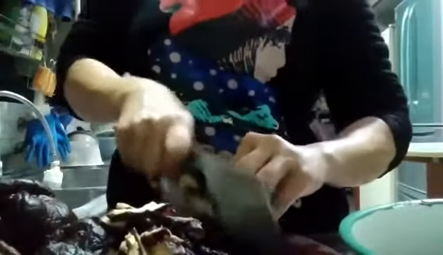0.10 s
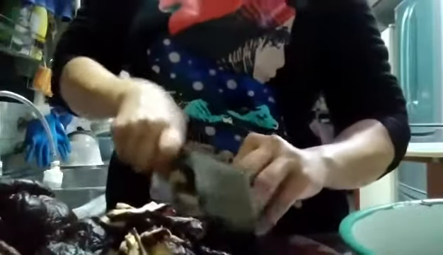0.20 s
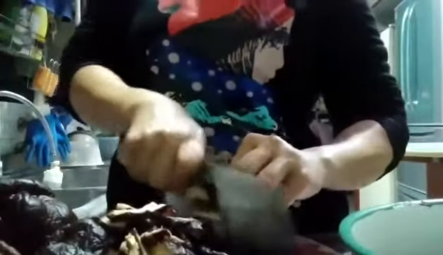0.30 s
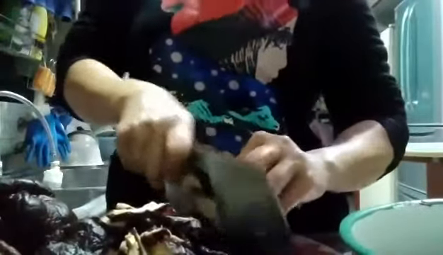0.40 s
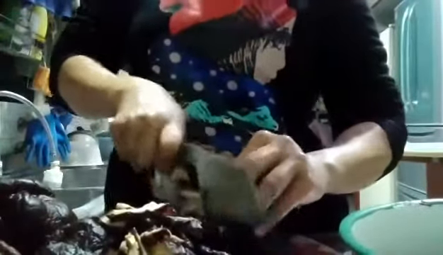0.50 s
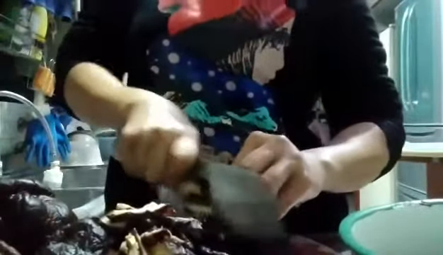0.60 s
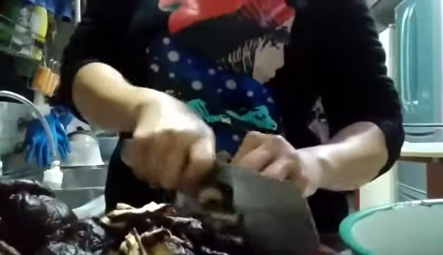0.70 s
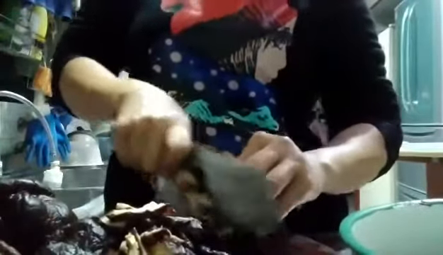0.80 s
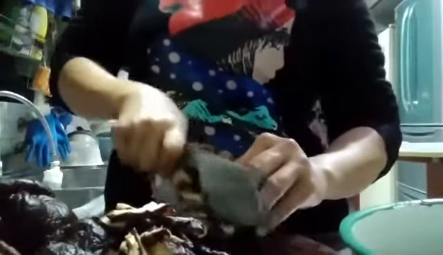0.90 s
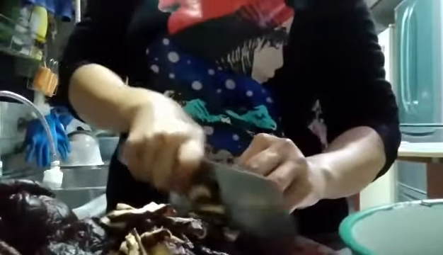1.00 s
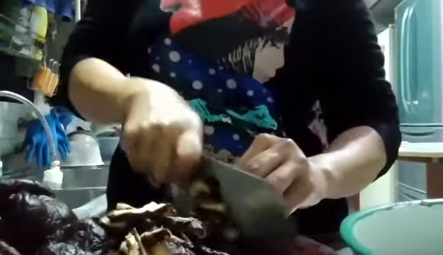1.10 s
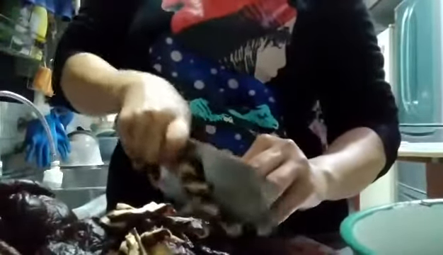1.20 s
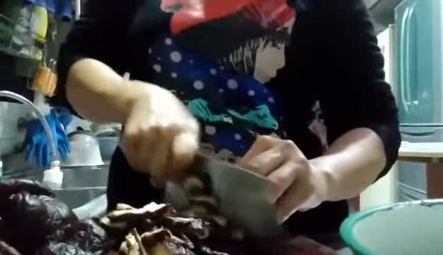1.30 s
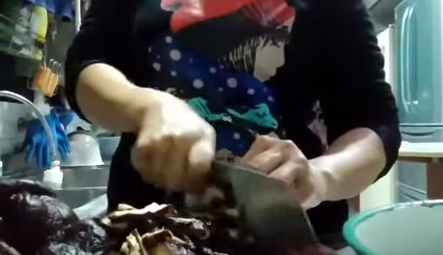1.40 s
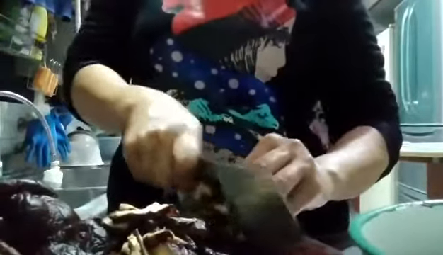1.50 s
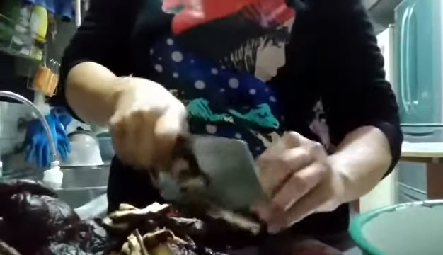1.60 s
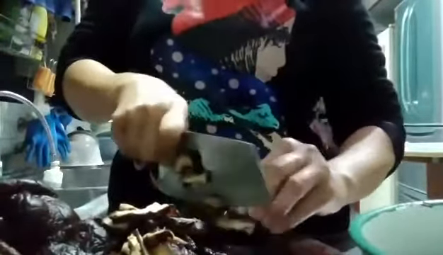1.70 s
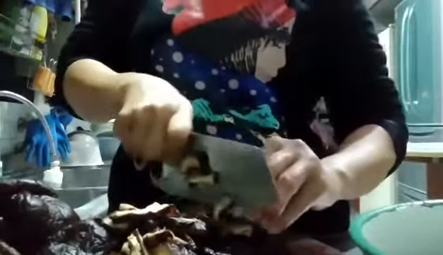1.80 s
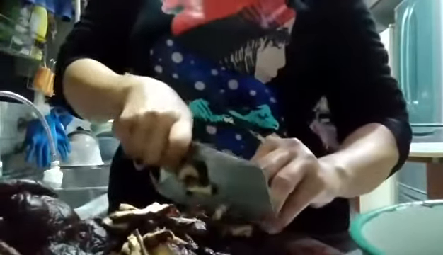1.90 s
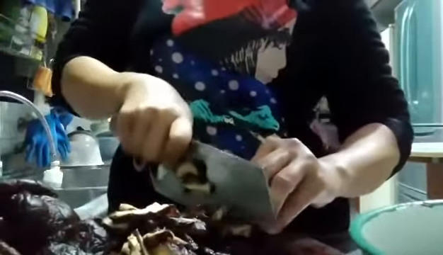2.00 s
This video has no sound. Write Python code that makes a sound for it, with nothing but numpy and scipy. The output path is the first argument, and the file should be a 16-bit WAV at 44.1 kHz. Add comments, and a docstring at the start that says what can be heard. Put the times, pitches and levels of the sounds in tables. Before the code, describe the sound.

A cleaver chops mushrooms on a wooden board in a small, hard kitchen. The previous blow's tail fades at the start. The hardest, brightest chop lands at 0.22 s, crunching with a brief blade ring and overloading the microphones. Softer, duller woody knocks follow at 0.59, 0.96 and 1.31 s. Faint slice rustles come between, longest around 1.36 s, over steady low motor hum and soft hiss.

```python
"""Small hard kitchen: a cleaver chops through mushrooms onto a wooden board; slices rustle between blows.
Blows excite counter and board modes through a soft contact, plus a crushing noise burst and blade ring.
Rustles are noise grains under bell-shaped swells; motor and mains hum are wavering sines over shaped hiss.
Two spaced microphones; the hardest blow overloads them."""
import sys
import numpy as np
from scipy import signal
from scipy.fft import rfft, irfft
from scipy.io import wavfile

SR = 44100
rng = np.random.default_rng(int(sys.argv[2]) if len(sys.argv) > 2 else 0)


def bounce(signal):
    """Save signal as a 16-bit WAV file at the path given by the first command-line argument."""
    frames = np.transpose(np.atleast_2d(signal))
    limited = np.clip(frames, -1, 1)
    pcm = np.round(limited * 32767).astype(np.int16)
    wavfile.write(sys.argv[1], SR, pcm)


N = 88200

# blows, blade onto board: start_s, modes_db, contact_cutoff_hz, crush_db, blade_db
BLOWS = [(-.14, 6.5, 1723, 0, -30), (0.2227, 8.5, 3100, 1.5, -18), (.590, 2.5, 1830, -10.5, -28.5),
         (0.9579, 3, 1480, -11, -38), (1.3052, 4.5, 1460, -9, -40)]
# counter modes, alike in both microphones: pitch_hz, level_db, t60_s
COUNTER_MODES = [(51.2, -29, 0.17), (224.6, -23.5, 0.11), (250.7, -22.5, 0.14), (281.6, -18, 0.13),
                 (308.7, -29, 0.3), (347.2, -22.5, 0.15)]
# board modes: pitch_hz, level_db, t60_s, left_over_right_db, left_lead_ms
BOARD_MODES = [(569.5, -32.5, 0.096, -18, 1), (723.7, -13, 0.072, 2.5, -0.19),
               (806, -15, 0.057, -10, -0.67), (903, -22, 0.04, 19, -0.28), (1240, -22, 0.042, -19, -0.71),
               (1328.5, -6.5, 0.037, 6, -0.12), (1479.5, -17, 0.031, 26.5, -0.241),
               (1620, -27, 0.066, 14, -0.019), (1781.5, -11, 0.031, -9.5, 0.18),
               (2106, -10.5, 0.013, -16.5, 0.349), (2198, -9, 0.025, 9.5, 0.178),
               (2269, -14, 0.017, 19, 0.11), (2496, -13, 0.013, -19, 0.0024),
               (3195, -17.5, 0.028, 6, 0.053)]
# blade modes: pitch_hz, level_db, t60_s, left_lead_ms
BLADE_MODES = [(1363, 5.5, 0.14, -0.047), (1430, -5, .25, 0.25), (2230, -4, 0.04, 0.2),
               (2260, -3.5, 0.11, 0.074), (2250, -12, 0.14, -0.26)]
# crushed flesh and fibre, relative spectrum: centre_hz, level_db
CRUSH_COLOUR = [(300, -12), (700, 15), (1500, 0.5), (2500, 1), (3500, -15), (4300, -21.5), (5500, -9),
                (9000, -5), (12000, -45)]
# crush decay: centre_hz, t60_s
CRUSH_DECAY = [(300, 0.11), (1500, 0.052), (3000, 0.087), (6000, 0.01)]
# room decay: centre_hz, t60_s
ROOM_DECAY = [(150, 0.11), (350, 0.57), (700, 0.4), (1400, 0.33), (2500, 0.37), (5000, 0.66)]
# room relative spectrum: centre_hz, level_db
ROOM_TINT = [(150, -16), (300, -10), (600, -2), (1000, -3), (1400, 0), (2500, 1.5), (5000, -2)]
# hum tones: pitch_hz, level_db (rms), waver_db (spread), waver_cutoff_hz
HUM_TONES = [(53, -47, 3, 8), (81.3, -36.5, 2, 6), (119.4, -38, 1.2, 5), (240, -51, 2, 5)]
# room hiss, relative density: pitch_hz, level_db (per Hz)
HISS_SPECTRUM = [(25, -12), (60, -3.5), (100, 8), (150, -2), (230, -3.5), (400, -5), (600, -6.5),
                 (1000, -13), (2000, -18.5), (3500, -22.5), (5500, -29.5), (7500, -35.5), (9500, -25.5),
                 (10800, -32.5), (12000, -44)]
# slices against the blade: centre_s, half_length_s, level_db (at swell peak), centre_hz
SLICE_RUSTLES = [(0.018, 0.017, -50, 3380), (0.165, 0.012, -43.5, 2800), (0.22, 0.0025, -45, 2580),
                 (0.576, 0.012, -52.5, 3970), (0.614, 0.035, -47, 2820), (.706, .013, -42.5, 3330),
                 (1.064, 0.02, -52.5, 3500), (1.248, 0.012, -61, 4030), (1.304, 0.0015, -40, 2120),
                 (1.357, 0.11, -50.5, 2980), (1.432, 0.016, -45, 4900)]
# white spectrum: pitch_hz, level_db
WHITE = [(20, 0), (20000, 0)]

LEAD_IN = SR // 4  # samples computed before the output starts
MODE_SCATTER_DB = 1.5
THUD_LOW_HZ = 180  # below this, mostly the lowest counter mode
STRIKE_RISE_S, CRUSH_RISE_S = 0.0019, 0.00085
BOARD_RISE_CYCLES = 1
CRUSH_CUTOFF_RATIO, CRUSH_CUTOFF_MAX_HZ = 3.24, 18000  # ratio to contact cut-off
ROOM_DB, ROOM_GAP_S, ROOM_RISE_S = -9, 0.0022, 0.0013
HISS_DB = -38.5
GRAINS_PER_S, RUSTLE_SPAN = 1500, 2.3  # span: factor below and above centre
MIC_SPACING_M, SOUND_M_PER_S, RIGHT_DB = 0.21, 343, 0.07
OVERLOAD_PEAK = 0.99
MIC_STOP_HZ, FINAL_STOP_HZ = 12820, 17000  # stopband edges


def amp(db):
    """Decibels to amplitude factor."""
    return 10 ** (np.asarray(db) / 20)


def rms_one(x):
    """Scale to unit rms over all channels."""
    return x / np.sqrt(np.mean(x ** 2) + 1e-20)


def at_hz(points, hz):
    """Interpolate a two-column table over log frequency."""
    points = np.array(points)
    return np.interp(np.log(hz), np.log(points[:, 0]), points[:, 1])


def filtered(x, cutoff_hz, kind):
    """Second-order Butterworth design: low, high or band."""
    return signal.sosfilt(signal.butter(2, cutoff_hz, kind, fs=SR, output="sos"), x)


def drift(cutoff_hz):
    """Slow unit-rms chance: two-pole smoothed noise on a 40-sample grid."""
    step = 40
    r = np.exp(-2 * np.pi * step * cutoff_hz / SR)
    noise = rng.standard_normal(N // step + 2002)
    slow = rms_one(signal.lfilter([1], [1, -2 * r, r * r], noise)[2000:])
    return np.interp(np.arange(N) / step, np.arange(len(slow)), slow)


def diffuse(size, spectrum):
    """Noise from all sides at two spaced microphones: alike in the bass, unrelated in the treble."""
    hz = np.maximum(np.fft.rfftfreq(size, 1 / SR), 1)
    alike = np.sinc(2 * hz * MIC_SPACING_M / SOUND_M_PER_S)
    mid, side = rfft(rng.standard_normal((2, size))) * amp(at_hz(spectrum, hz))
    left_right = np.sqrt(1 + alike) * mid + np.sqrt(1 - alike) * side * [[1], [-1]]
    return rms_one(irfft(left_right, size))


def dying_noise(noise, decay, colour):
    """Half-octave bands, each with its own level and exponential decay."""
    t = np.arange(noise.shape[1]) / SR
    out = 0
    for low_hz in 80 * 2 ** np.arange(0, 7.5, 0.5):
        centre_hz = low_hz * 1.19
        envelope = amp(at_hz(colour, centre_hz) - 60 * t / at_hz(decay, centre_hz))
        out = out + filtered(noise, [low_hz, low_hz * np.sqrt(2)], "band") * envelope
    return out


def counter_thud(t, scatter_db):
    """Damped counter modes; all but the lowest are inverted and high-passed."""
    rise = 1 - np.exp(-t / STRIKE_RISE_S)
    modes = [amp(level_db + odd_db - 60 * t / t60_s) * np.sin(2 * np.pi * hz * t) * rise
             for (hz, level_db, t60_s), odd_db in zip(COUNTER_MODES, scatter_db)]
    return modes[0] - filtered(sum(modes[1:]), THUD_LOW_HZ, "high")


def board_ring(t, scatter_db):
    """Damped board modes of alternating sign, each with its own pan and arrival offset."""
    out = np.zeros((2, len(t)))
    for k, (hz, level_db, t60_s, pan_db, lead_ms) in enumerate(BOARD_MODES):
        delay_s = np.array([[-lead_ms], [lead_ms]]).clip(0) / 1000
        late = np.maximum(t - delay_s, 0)
        side_db = pan_db * np.array([[0.5], [-0.5]])
        envelope = amp(level_db + scatter_db[k] + side_db - 60 * late / t60_s)
        rise = 1 - np.exp(-late * hz / BOARD_RISE_CYCLES)
        out -= (-1) ** k * envelope * rise * np.sin(2 * np.pi * hz * late)
    return out


def soft_contact(x, contact_hz):
    """Two equal one-pole low-passes: a softer contact excites less treble."""
    r = np.exp(-2 * np.pi * contact_hz / SR)
    return signal.lfilter([(1 - r) ** 2], [1, -2 * r, r * r], x)


def crush_burst(t, contact_hz):
    """Crushed flesh and fibre: band-wise dying noise, brighter for a harder contact."""
    burst = dying_noise(diffuse(len(t), WHITE), CRUSH_DECAY, CRUSH_COLOUR)
    burst = burst * np.minimum(t / CRUSH_RISE_S, 1)
    return filtered(burst, min(contact_hz * CRUSH_CUTOFF_RATIO, CRUSH_CUTOFF_MAX_HZ), "low")


def blade_ring(t):
    """Damped blade modes, phase-advanced on the left by each lead."""
    out = 0
    for hz, level_db, t60_s, lead_ms in BLADE_MODES:
        shifted = t + lead_ms * np.array([[1], [0]]) / 1000
        out = out + amp(level_db - 60 * t / t60_s) * np.sin(2 * np.pi * hz * shifted)
    return out * np.minimum(t / STRIKE_RISE_S, 1)


def chops():
    """Each blow sums contact-filtered counter and board modes, crush and blade; includes lead-in."""
    out = np.zeros((2, N + 2 * SR))
    t = np.arange(SR // 3) / SR
    scatter = rng.normal(0, MODE_SCATTER_DB, (len(BLOWS), len(BOARD_MODES) + len(COUNTER_MODES)))
    for (start_s, modes_db, contact_hz, crush_db, blade_db), odd_db in zip(BLOWS, scatter):
        board_db, counter_db = np.split(odd_db, [len(BOARD_MODES)])
        modes = soft_contact(counter_thud(t, counter_db) + board_ring(t, board_db), contact_hz)
        blow = amp(modes_db) * modes
        blow = blow + amp(crush_db) * crush_burst(t, contact_hz)
        blow = blow + amp(blade_db) * blade_ring(t)
        i = int(start_s * SR) + LEAD_IN
        out[:, i:i + len(t)] += blow
    return out[:, :N + LEAD_IN]


def room(x):
    """Dense reflections: convolution with noise that dies band by band."""
    t = np.arange(SR) / SR
    tail = dying_noise(diffuse(SR, WHITE), ROOM_DECAY, ROOM_TINT)
    tail = tail * np.clip((t - ROOM_GAP_S) / ROOM_RISE_S, 0, 1)
    tail = tail / np.sqrt(np.sum(tail ** 2, axis=1, keepdims=True))  # unit energy per channel
    return amp(ROOM_DB) * signal.fftconvolve(x, tail, axes=1)[:, :x.shape[1]]


def hum():
    """Motor and mains: steady-pitch sines whose levels waver."""
    t = np.arange(N) / SR
    out = 0
    for hz, level_db, waver_db, waver_hz in HUM_TONES:
        level = np.sqrt(2) * amp(level_db + waver_db * drift(waver_hz))
        out = out + level * np.sin(2 * np.pi * (hz * t + rng.random()))
    return out


def hiss():
    """Steady diffuse noise with the room's spectrum."""
    return amp(HISS_DB) * diffuse(N, HISS_SPECTRUM)


def rustles():
    """Slices crunch and slide: dense uneven grains, band-passed under bell-shaped swells."""
    t = np.arange(N) / SR
    size = amp(3.2 * np.minimum(rng.exponential(1, (2, N)), 4))
    sign = rng.choice([-1, 1], (2, N))
    grains = size * sign * (rng.random((2, N)) < GRAINS_PER_S / SR)
    out = 0
    for centre_s, half_s, level_db, hz in SLICE_RUSTLES:
        swell = np.exp(-((t - centre_s) / half_s) ** 2)
        texture = rms_one(filtered(grains, [hz / RUSTLE_SPAN, hz * RUSTLE_SPAN], "band"))
        out = out + amp(level_db) * swell * texture
    return out


def scene():
    """Blows and their reflections, hum, hiss and rustles."""
    blows = chops()
    return (blows + room(blows))[:, LEAD_IN:] + hum() + hiss() + rustles()


def record(dry):
    """Microphones roll off on top, the input overloads hard, then the top is cut."""
    x = signal.sosfilt(signal.cheby2(6, 30, MIC_STOP_HZ, fs=SR, output="sos"), dry)
    x = x * amp([[0], [RIGHT_DB]]) / OVERLOAD_PEAK
    x = OVERLOAD_PEAK * x / (1 + np.abs(x) ** 20) ** (1 / 20)
    return signal.sosfilt(signal.cheby2(12, 70, FINAL_STOP_HZ, fs=SR, output="sos"), x)


dry = scene()
out = record(dry)
bounce(out)
```